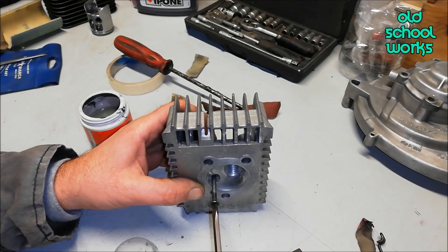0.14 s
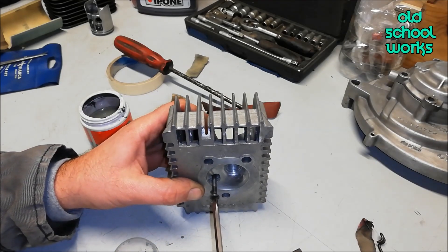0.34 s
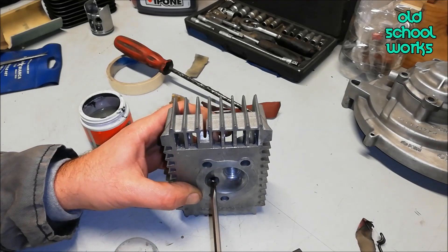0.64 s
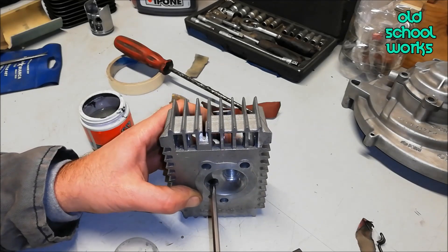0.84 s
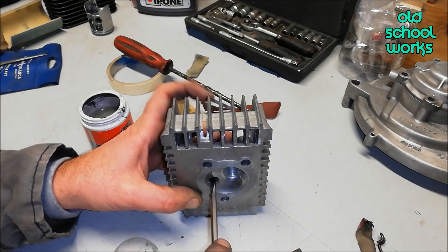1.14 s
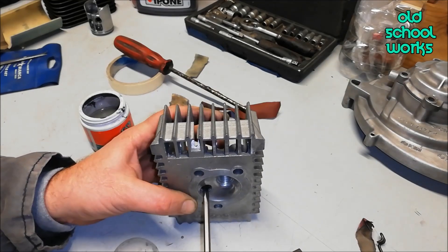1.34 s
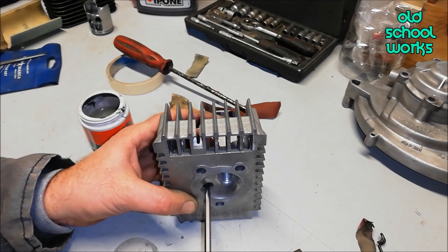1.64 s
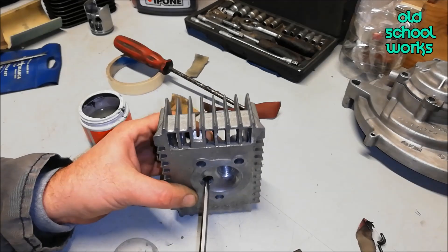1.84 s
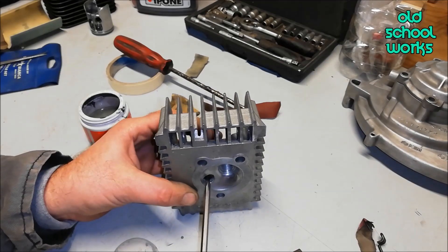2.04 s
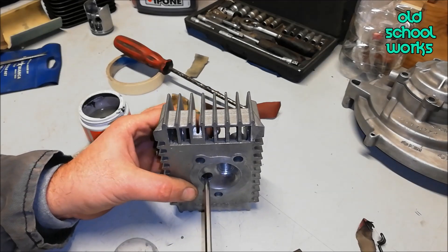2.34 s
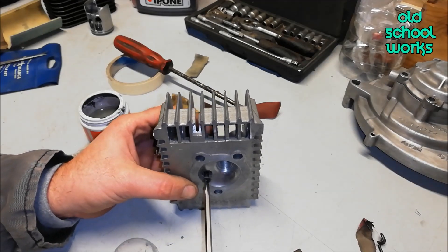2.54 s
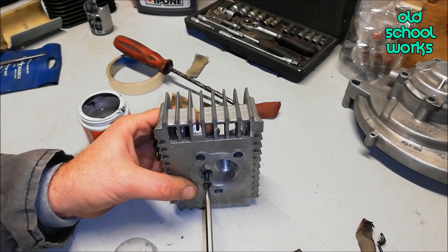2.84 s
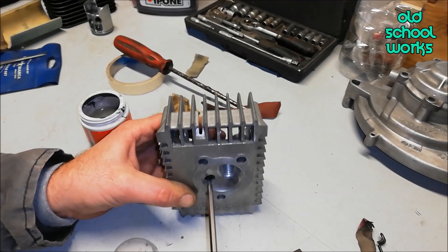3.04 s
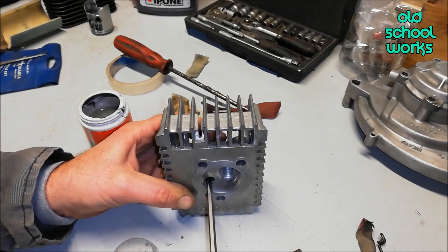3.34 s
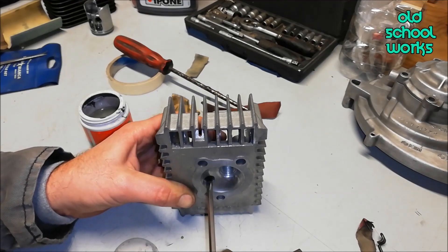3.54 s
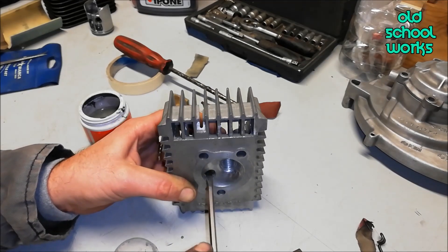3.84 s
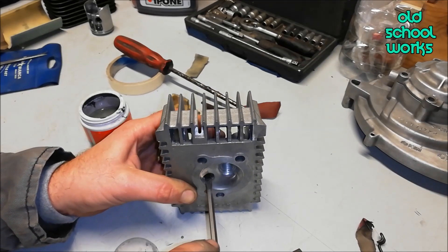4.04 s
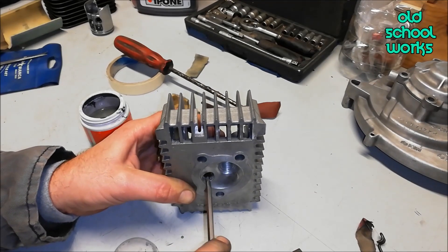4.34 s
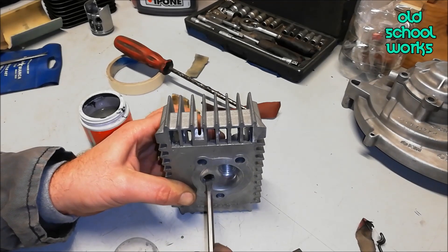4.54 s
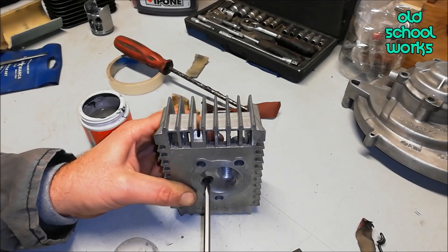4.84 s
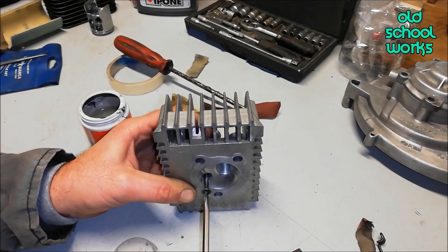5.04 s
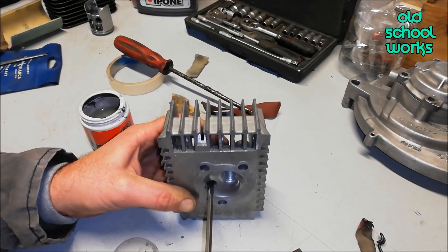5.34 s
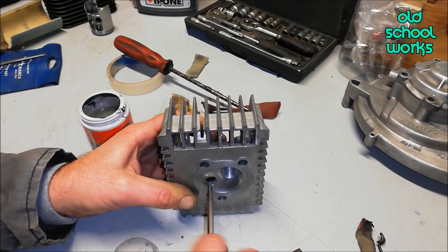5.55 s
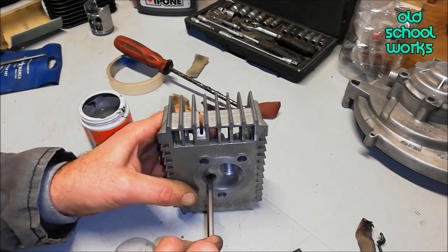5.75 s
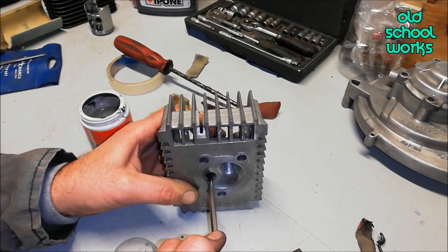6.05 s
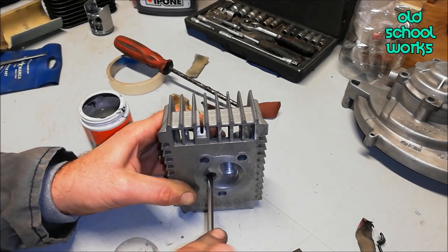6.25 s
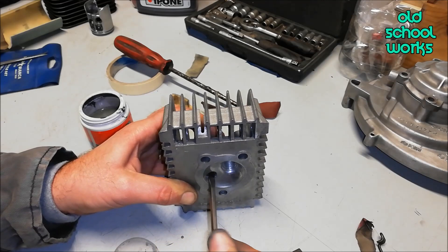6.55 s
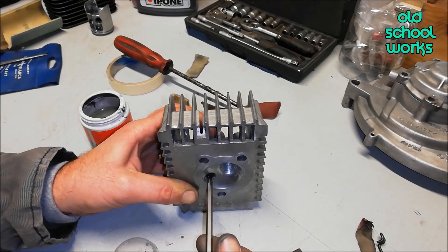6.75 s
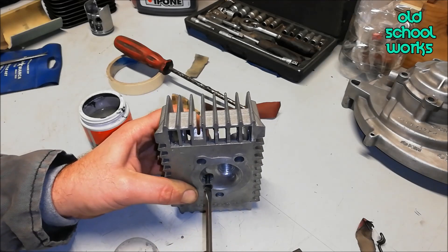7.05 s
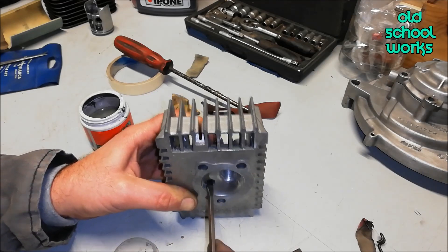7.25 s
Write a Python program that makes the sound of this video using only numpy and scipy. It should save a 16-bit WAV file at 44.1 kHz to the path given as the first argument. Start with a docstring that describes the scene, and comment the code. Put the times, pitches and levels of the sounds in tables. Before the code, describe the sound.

Close metal scraping and gritty hissing are broken by three sharp, ringing clacks as an engine part knocks lightly on a workbench.

```python
"""A steel stem rasps and squeaks in its guide as a valve is worked to and fro in a small cylinder head.
The head knocks and scuffs on a workbench, close to a stereo camera. Gritty paste hisses and crunches
under the turning valve. After a few light taps, the valve clacks hard onto its seat three times and
the steel rings. Behind it all, a low drone, like far traffic, swells and fades over faint room hiss."""
import sys
import numpy as np
from scipy import signal
from scipy.fft import rfft, irfft
from scipy.io import wavfile
from scipy.ndimage import uniform_filter1d

SR = 44100
rng = np.random.default_rng(int(sys.argv[2]) if len(sys.argv) > 2 else 0)


def to_wav(sig):
    """Store sig (one row per channel, or 1-D mono) as 16-bit WAV at the path in sys.argv[1].

    Samples outside -1..1 are clipped; the rate is SR.
    """
    pcm = np.clip(np.atleast_2d(sig), -1, 1) * 32767
    pcm = np.round(pcm).astype(np.int16)
    wavfile.write(sys.argv[1], SR, pcm.T)  # frames by channels


N = 326781
TIME = np.arange(N) / SR
FREQS = np.fft.rfftfreq(N, 1 / SR)

# tone colour of the gritty paste: pitch_hz, level_db
PASTE_COLOUR = [(530, -19.5), (900, -18.5), (1470, -12.5), (1620, -8.5), (2300, -17), (2470, -9.5),
                (3000, -14.5), (3850, -9.5), (4450, -10.5), (6110, -5.5), (6720, -14.5), (7680, -6),
                (8550, 9), (10100, 8.5), (11100, -0.5), (12100, -5.5), (15100, -10.5), (16000, -11)]
# steel hits steel: time_s, crack_db, lowest_hz, ring_db, favoured_hz, ping_db
CLACKS = [(.812, -54, 2520, -89, 3080, -61), (1.1005, -42, 6250, -80, 9600, -95),
          (1.124, -42, 4500, -57, 8400, -95), (1.153, -35.5, 5800, -61, 8800, -95),
          (1.213, -33.5, 3860, -44, 6340, -77), (1.631, -45.5, 4930, -75, 9000, -98),
          (3.055, -12, 210, -32, 5700, -37.5), (5.3023, -15, 501, -32, 8400, -43.5),
          (7.3364, -11.5, 199, -25.5, 8830, -39.5)]
# notes of the valve and finned head: pitch_hz, level_db, ring_s (time to fade by 60 dB)
STEEL_NOTES = [(2536, -5, .22), (2850, -2, .12), (4156, -6, .12), (4425, -8, .08), (5040, -8, .1),
               (5792, -10, .18), (5965, 3.5, .145), (6288, -6, .16), (6435, -10, .11), (7400, -15, .22),
               (8218, 5, .23), (8417, -8, .2), (9803, -2, .14), (10100, -20, .14), (13200, -24, .1)]
# notes of the head on the bench top: pitch_hz, level_db, ring_s
BENCH_NOTES = [(120, -19.5, 0.18), (233, -5, 0.094), (272, -4, 0.17), (336, -2, 0.026), (425.6, 2.5, 0.034),
               (500.6, -4.5, 0.052), (703.5, -6, 0.061), (809, -10, 0.054), (966, -11.5, 0.068),
               (1055, -7.5, 0.03), (1283, -8.5, 0.023), (1570, -16, 0.022)]

TREBLE_PRESS_DB, TREBLE_DULL_DB_PER_S = 1, 8.5  # in each turn: the treble's swell and its steady fade


def paste():
    """The turning valve crushes gritty paste into a hiss that swells and dulls during each turn."""
    grit = grains(per_s=9000, spread_db=2.0) * amp(2.7 * wander(rate_hz=190))
    hiss = friction(grit, PASTE_COLOUR, ring_db=-8)
    highs = 1 / (1 + (7800 / (FREQS + 1)) ** 16)
    body = amp(-0.73) * unit(tint(hiss, 1 - highs))
    fizz = amp(-6.5) * unit(tint(hiss, highs))
    finest = tint(fizz, 1 / (1 + (10500 / (FREQS + 1)) ** 16))
    return (body * turns(press_db=4)
            + (fizz - finest) * turns(TREBLE_PRESS_DB, TREBLE_DULL_DB_PER_S, treble=True)
            + amp(6) * finest * turns(press_db=3, dull_db_per_s=5, treble=True, finest=True))


def turns(press_db, dull_db_per_s=0, treble=False, finest=False):
    """Loudness over time: each turn bites, swells as the hand presses, and fades as it eases off."""
    # turns: start_s, end_s, level_db, treble_extra_db, finest_extra_db, bite_s, fade_db_per_s
    strokes = [(3.373, 3.636, -46, 1.5, 6, 0.02, 121), (3.674, 3.978, -49, 2.5, -0.5, .03, 332),
               (4.213, 4.66, -48.5, -1.5, 5, .014, 85), (4.61, 4.827, -56, -12.5, -10, 0.062, 230),
               (5.363, 5.707, -45.5, -1.5, 6.5, 0.011, 141), (5.788, 5.906, -47, 1, -1, 0.1, 232),
               (6.121, 6.72, -52, -4.5, 10, .03, 145)]
    gain = np.zeros(N)
    for start, end, db, treble_db, finest_db, bite_s, fade_db_per_s in strokes:
        progress = np.clip((TIME - start) / (end - start), 0, 1)
        bite = np.clip((TIME - start) / bite_s, 0, 1)
        band_db = db + treble * treble_db + finest * finest_db
        swell_db = press_db * (np.sin(np.pi * progress) - 1)
        dull_db = dull_db_per_s * (progress - .5) * (end - start)
        fade_db = fade_db_per_s * np.maximum(TIME - end, 0)
        gain += bite * amp(band_db + swell_db - dull_db - fade_db)
    return gain * amp(1.95 * wander(rate_hz=4))  # the hand is unsteady


def crunches():
    """Coarse grains burst under the valve and ring the steel."""
    # bursting grains: time_s, level_db
    coarse_grains = [(3.472, -43), (3.622, -33), (3.762, -40), (3.91, -32.5), (3.96, -35.5), (4.052, -46),
                     (4.668, -45), (6.328, -39)]
    bursts, t = np.zeros(N), np.arange(SR // 10) / SR
    for s, db in coarse_grains:
        add(bursts, s, amp(db) * np.exp(-t / 0.004))
    return bursts * unit(friction(rng.standard_normal(N), PASTE_COLOUR, ring_db=20))


def singing():
    """Grinding keeps a few high notes of the valve sounding; each comes and goes."""
    # singing notes: pitch_hz, half_width_hz, level_db
    notes = [(5960, 90, -15), (6290, 45, -16), (7480, 30, -18), (8420, 120, -6), (9810, 30, -6.5)]
    out = np.zeros(N)
    for hz, width, db in notes:
        swell_db = 2 * wander(rate_hz=5)
        band = 1 / (1 + ((FREQS - hz) / width) ** 2)
        out += amp(db + swell_db) * unit(tint(rng.standard_normal(N), band))
    return out * turns(TREBLE_PRESS_DB, TREBLE_DULL_DB_PER_S, treble=True)


def stem():
    """The stem rasps as it drags unevenly through its guide."""
    # pushes of the stem: start_s, end_s, level_db, build_up (see slides)
    pushes = [(.12, .39, -54.5, 0.83), (.41, .59, -52.5, 0.23), (.59, .805, -48.5, 0.45),
              (1.15, 1.205, -51.5, .2), (1.55, 2, -63, 0.33), (2.568, 2.655, -46, 0.15),
              (2.975, 3.05, -32.5, 1.4), (4.94, 5.035, -43, 1.06), (5.15, 5.298, -35, 2.4),
              (6.915, 7.095, -54, 0.19), (7.28, 7.333, -34.5, 1.1)]
    # tone colour of the rasp: pitch_hz, level_db
    colour = [(760, -15), (1300, -12), (1780, -16.5), (2130, -10.5), (2620, -6.5), (3170, -8), (4080, -5),
              (4580, -8), (6150, -4), (6690, -9.5), (8340, -4.5), (10200, -15), (12600, -27), (14700, -32),
              (16000, -50)]
    grit = grains(per_s=5600, spread_db=-1.5) * amp(1.36 * wander(rate_hz=62))
    return amp(0.5) * unit(friction(grit, colour, ring_db=15)) * slides(pushes, stop_db_per_s=401)


def squeaks():
    """Where the stem runs dry, it sticks and slips, squeaking around one pitch."""
    # squeaks: start_s, length_s, pitch_hz, level_db
    dry_spots = [(0.134, 0.033, 4700, -60.5), (0.931, 0.037, 3630, -57.5), (0.907, 0.065, 6440, -59.5),
                 (1.567, 0.04, 4960, -62.5), (1.887, 0.09, 2730, -53), (2.575, 0.25, 5950, -67),
                 (2.591, .19, 10300, -75), (4.963, 0.089, 2150, -48.5), (6.914, 0.17, 2103, -59.5)]
    out = np.zeros(N)
    for s, length, hz, db in dry_spots:
        slips = rng.standard_normal(SR // 2)
        for _ in range(2):
            slips = signal.lfilter(*signal.iirpeak(hz, Q=6, fs=SR), slips)
        span = int(length * SR)
        add(out, s, amp(db) * unit(slips[-span:]) * signal.windows.tukey(span, .5))
    return out


def cracks():
    """Each clack begins with a sharp crack through the head and a short rattle of its fins."""
    # tone colour of the crack: pitch_hz, level_db
    colour = [(80, -20), (260, -17), (700, -11), (1100, 5), (1900, -4.5), (2600, 2.5), (3200, -6),
              (4300, -7), (8700, -3), (10500, -9), (13400, -29), (16000, -24)]
    out, t = np.zeros(N), np.arange(SR // 4) / SR
    fade = np.exp(-t / 0.0026) + amp(-14) * np.exp(-t / 0.0095)
    for s, crack_db, lowest_hz, *_ in CLACKS:
        burst = fade * rng.standard_normal(len(t))
        add(out, s, amp(crack_db) * tint_burst(burst, colour, lowest_hz))
    return out


def rings():
    """Struck steel rings on, most near the pitch that the point of contact favours."""
    # the valve's long bell note: pitch_hz, level_db, ring_s
    ping = [(3413, 0, .54), (3437, -7, .28)]
    # a thin steel part that clinks once: pitch_hz, level_db, ring_s
    clink = [(2772, -50, .1), (3564, -48, .13), (3900, -51, .04), (4425, -39, .06), (5660, -46, .06),
             (5965, -49, .1), (6282, -42, .11), (6433, -39, .07), (7477, -46, .11), (11770, -41, .055)]
    out, pitches = np.zeros(N), np.array(STEEL_NOTES)[:, 0]
    for s, _, _, ring_db, favoured_hz, ping_db in CLACKS:
        favour_db = 10 * np.exp(-(np.log(pitches / favoured_hz) / 0.083) ** 2) - 5
        add(out, s, amp(ring_db) * ring(STEEL_NOTES, favour_db) + amp(ping_db) * ring(ping))
    add(out, 1.2085, amp(5) * ring(clink))
    return out


def knocks():
    """The head tips onto an edge, thuds and chatters; harder edges bring out the upper notes."""
    # the head rocks: time_s, level_db, upper_notes_db
    tips = [(0.4179, -27.5, -13.5), (0.461, -37.5, -12), (0.498, -42.5, -22), (0.573, -43.5, -16),
            (0.692, -36.5, -24), (0.711, -39, -24), (1.272, -33.5, -14.5), (1.475, -36, -13),
            (1.672, -37, -17), (1.681, -38.5, -6), (1.78, -40.5, -20), (1.936, -34, -16.5),
            (1.948, -32, -23), (2.2, -37.5, -19), (2.684, -35.5, -16), (2.746, -41, -20),
            (2.778, -40.5, -20), (3.22, -33, -11), (4.064, -45.5, -17), (4.62, -32, -17),
            (4.639, -32.5, -17), (5.076, -36.5, -13), (5.208, -36, -25), (5.52, -26, -21),
            (6.832, -45.5, -14), (7.308, -27.5, -17), (7.321, -21.5, -28)]
    out, t = np.zeros(N), np.arange(SR // 20) / SR
    upper = np.array(BENCH_NOTES)[:, 0] > 600
    thud_hz, rise_s = 119, 0.0044  # the head's weight pushes the bench down
    thud = np.sin(2 * np.pi * thud_hz * t) * t / rise_s * np.exp(1 - t / rise_s)
    for s, db, upper_db in tips:
        force = .09 * rng.standard_normal(len(t)) * np.exp(-t / .0045)
        force[0] += 1  # one sharp hit leads the chatter
        contact_db = -0.5 * rng.standard_normal(len(BENCH_NOTES))  # each spot sounds a little different
        notes = ring(BENCH_NOTES, upper * (upper_db + 17.5) + contact_db, length_s=.3)
        blow = signal.fftconvolve(force, notes)
        add(out, s, amp(db + 0.5) * blow / abs(blow).max())
        add(out, s, amp(db - 9) * thud)
    return out


def scuffs():
    """The dragged head sticks and slips, shaking the bench."""
    # drags: start_s, end_s, level_db, build_up (see slides)
    drags = [(.42, .54, -66, .1), (.665, .81, -50, 0.24), (1.245, 1.27, -45, 0.46),
             (1.68, 1.86, -52.5, 0.089), (1.86, 1.96, -39, 0.93), (2.575, 2.65, -43.5, 0.38),
             (2.985, 3.054, -30.5, 1.35), (4.63, 4.725, -51.5, .1), (4.97, 5.025, -40, 0.86),
             (5.185, 5.302, -33, 0.53), (5.675, 5.715, -45, 0.13), (7.295, 7.33, -30.5, 1.15)]
    slips = grains(per_s=700, spread_db=-1.0)
    brighten_db = 5.16 * np.log2(np.array(BENCH_NOTES)[:, 0] / 400)
    shaken = signal.fftconvolve(slips, ring(BENCH_NOTES, brighten_db))[:N]
    return amp(-2) * unit(shaken) * slides(drags, stop_db_per_s=424)


def bench():
    """The soft bench top muffles knocks and scuffs; near 700 Hz they nearly cancel on the left."""
    muffle = signal.butter(4, [65, 1700], "bandpass", fs=SR, output="sos")
    dull = signal.sosfilt(muffle, knocks() + scuffs())
    left, right = workshop(dull, near_db=-12, room_db=-13.5, left_db=-1)
    left = left - 0.72 * signal.lfilter(*signal.iirpeak(700, Q=2.2, fs=SR), left)
    return amp(1.5) * np.array([left, right])


def traffic():
    """Far traffic passes: a soft rush, and a wavering drone with a second note an octave up."""
    # the drone's path: time_s, pitch_hz, level_db
    drone = [(1.75, 47.5, -58), (1.88, 47.1, -55), (2.0, 46.1, -39), (2.12, 44.1, -41.5), (2.5, 35.44, -61),
             (2.8, 33.9, -54), (3.13, 36.26, -68), (3.46, 36.1, -41.5), (3.98, 41.2, -38),
             (4.081, 41.3, -51.5), (4.45, 43.2, -43), (4.7, 44.8, -53), (5.08, 48.6, -58),
             (5.84, 48.05, -55), (6.3, 50.6, -53.5)]
    # tone colour of the rush: pitch_hz, level_db
    colour = [(30, -4), (60, -10), (105, 12), (170, -4.5), (300, 2.5), (500, -13), (1200, -7.5), (2200, -8),
              (4000, -20), (9000, -17), (12000, -37)]
    nearest_s, passing_s, fade_db_per_s = 5.3, 0.64, 13.5
    distance = np.hypot(1, (TIME - nearest_s) / passing_s)  # 1 when nearest
    rush_gain = amp(-51.5 - 19 * np.log10(distance))
    s, hz, db = np.transpose(drone)
    phase = 2 * np.pi * np.cumsum(np.interp(TIME, s, hz)) / SR
    away_db = fade_db_per_s * abs(TIME - np.clip(TIME, s[0], s[-1]))
    drone_gain = np.sqrt(2) * amp(np.interp(TIME, s, db) - away_db + 2.1 * wander(rate_hz=6.6))
    octave_gain = amp(-4.5) * rush_gain + amp(-18.5) * drone_gain
    octave = octave_gain * np.sin(2 * phase + 1.1 * wander(rate_hz=18))
    return drone_gain * np.sin(phase) + octave + rush_gain * air(colour, alike_hz=430)


def room_hiss():
    """The room's faint, steady noise."""
    # tone colour of the room: pitch_hz, level_db
    colour = [(12, -43), (20, -12), (52, -2), (150, -12), (446, -30), (527, -32), (1190, -26.5),
              (2670, -29.5), (3160, -25.5), (3530, -27.5), (7110, -31), (8180, -29), (16000, -40.5)]
    return amp(-61) * air(colour, alike_hz=533)


def workshop(x, near_db, room_db, left_db, lag_samples=5):
    """The left microphone hears first; bench clutter scatters the sound and the room adds a short echo."""
    # how long the echo lasts: pitch_hz, ring_s
    echo_times = [(100, 0.47), (400, 0.43), (2000, 0.43), (8000, 0.33), (16000, 0.12)]
    t = np.arange(SR // 2) / SR
    bounces = rng.choice([-1., 1.], (2, 2, len(t))) * (rng.random((2, 2, len(t))) < 4000 / SR)
    near = bounces[0] * np.exp(-t / 0.0044)
    hz, age_s, spectrum = signal.stft(bounces[1] * (t > .006), SR, nperseg=256)
    fade = amp(-60 * age_s / level_at(echo_times, hz)[:, None])
    tail = signal.istft(spectrum * fade, SR, nperseg=256)[1][:, :len(t)]
    echo = sum(amp(db) * part / np.linalg.norm(part, axis=1, keepdims=True)
               for db, part in [(near_db, near), (room_db, tail)])
    echo[0, 0] += 1  # the direct sound
    echo[1, lag_samples] += 1
    echo /= np.linalg.norm(echo, axis=1, keepdims=True)
    return amp([[left_db], [0]]) * signal.fftconvolve(x[None], echo, axes=1)[:, :N]


def friction(grit, colour, ring_db):
    """Grit clicks against the steel, whose notes stand out of the hiss."""
    notes = abs(rfft(ring(STEEL_NOTES), N))
    peaks = np.hypot(1, amp(ring_db) * notes / notes.max())
    return tint(grit, amp(level_at(colour, FREQS)) * peaks)


def slides(pushes, stop_db_per_s):
    """Loudness over time: each push gathers speed, then friction stops it."""
    gain = np.zeros(N)
    for start, end, db, build_up in pushes:  # build_up near 0: fast at once; 2: a late rush
        speed = np.clip((TIME - start) / (end - start), 0, 1) ** build_up
        gain += speed * amp(db - stop_db_per_s * np.maximum(TIME - end, 0))
    return gain


def drift(x, depth_db=1.5):
    """The scrape changes colour at random as the contact moves round the seat."""
    spectrum = signal.stft(x, nperseg=512)[2]
    patches = rng.standard_normal(spectrum.shape)
    for _ in range(2):
        patches = uniform_filter1d(uniform_filter1d(patches, size=8, axis=0), size=12, axis=1)
    return signal.istft(spectrum * amp(depth_db * unit(patches)), nperseg=512)[1][:N]


def ring(notes, extra_db=0, length_s=0.79):
    """The fading pure tones of a struck object; extra_db turns each up or down."""
    t = np.arange(int(length_s * SR)) / SR
    hz, db, ring_s = np.transpose(notes)
    tones = amp(-60 * t / ring_s[:, None]) * np.sin(2 * np.pi * hz[:, None] * t)
    return amp(db + extra_db) * rng.choice([-1, 1], len(hz)) @ tones


def grains(per_s, spread_db):
    """Random clicks; a few are much louder (spread_db above 0) or softer (below 0)."""
    size = amp(spread_db * np.minimum(rng.exponential(1, N), 5))
    return unit(size * rng.choice([-1, 1], N) * (rng.random(N) < per_s / SR))


def air(colour, alike_hz):
    """Steady stereo noise, alike on both sides in the bass."""
    shared, left, right = rng.standard_normal((3, N))
    same = 1 / np.sqrt(1 + (FREQS / alike_hz) ** 2)
    gain = amp(level_at(colour, FREQS))
    return unit(tint(shared, gain * same) + tint(np.array([left, right]), gain * np.sqrt(1 - same ** 2)))


def wander(rate_hz):
    """A smooth random wobble of typical size 1."""
    return unit(tint(rng.standard_normal(N), 1 / (1 + (FREQS / rate_hz) ** 2)))


def tint_burst(x, colour, low_hz, size=2048):
    """Colours a burst and thins it below low_hz, with no sound ahead of its start."""
    hz = abs(np.fft.fftfreq(size, 1 / SR))
    log_gain = np.log(amp(level_at(colour, hz)) / np.sqrt(1 + (low_hz / (hz + 1)) ** 8) + 1e-5)
    taps = np.fft.ifft(np.exp(np.conj(signal.hilbert(log_gain)))).real[:size // 2]
    return signal.fftconvolve(x, taps / np.linalg.norm(taps))[:len(x)]


def tint(x, gain):
    """Filters by a gain for each of FREQS."""
    return irfft(rfft(x) * gain, N)


def level_at(points, hz):
    """Looks up a table's value at any pitch, gliding between its rows."""
    pitches, values = np.transpose(points)
    return np.interp(np.log(hz + 1), np.log(pitches + 1), values)


def add(mix, s, sound):
    """Mixes a sound in at s seconds."""
    part = mix[max(round(s * SR), 0):][:len(sound)]
    part += sound[:len(part)]


def amp(db):
    """Decibels to gain."""
    return 10 ** (np.asarray(db) / 20)


def unit(x):
    """Scales to an average strength (rms) of 1."""
    return x / np.sqrt(np.mean(x ** 2) + 1e-20)


def scene():
    """All sources in the workshop; as the head shifts in the hand, the rubbing changes colour."""
    rub = drift(stem() + paste()) + crunches() + squeaks()
    angle = 2 * np.pi * TIME + 0.7 * wander(rate_hz=1.4)
    shares = abs(np.cos(angle)), abs(np.sin(angle))  # blend to and fro between two sets of echoes
    rubbing = sum(workshop(rub * share, near_db=4.5, room_db=-5, left_db=-0.9) for share in shares)
    hits = workshop(cracks(), near_db=1.5, room_db=-13, left_db=-2, lag_samples=2)
    ringing = workshop(rings(), near_db=-20, room_db=-16, left_db=0, lag_samples=2)
    sung = workshop(singing(), near_db=-9, room_db=-7, left_db=0)
    return amp(-0.05) * rubbing + sung + hits + ringing + bench() + traffic() + room_hiss()


def record(dry):
    """The camera cuts off the very highest treble."""
    top_hz = 15850
    return signal.oaconvolve(dry, signal.firwin(511, top_hz, window=("kaiser", 9), fs=SR)[None], "same")


dry = scene()
out = record(dry)
to_wav(out)
```